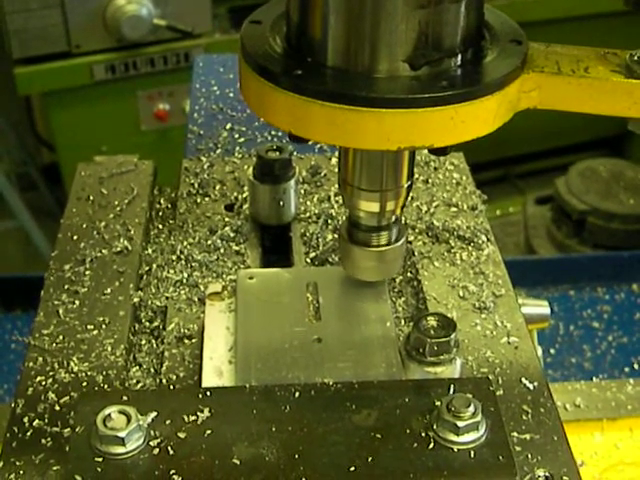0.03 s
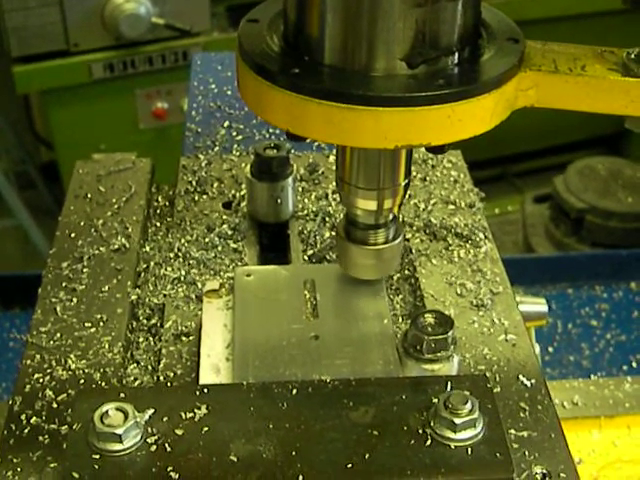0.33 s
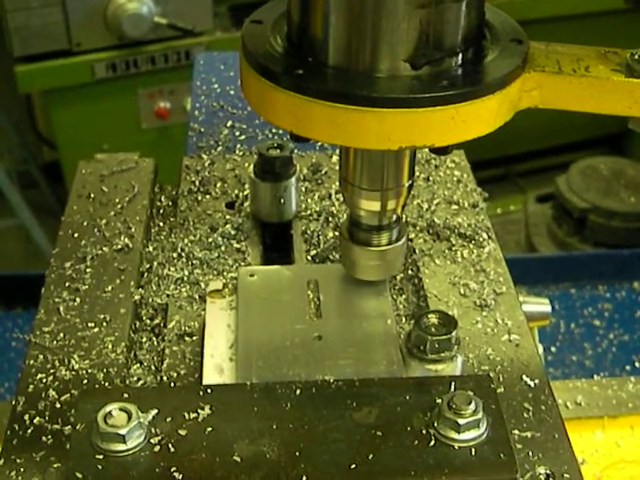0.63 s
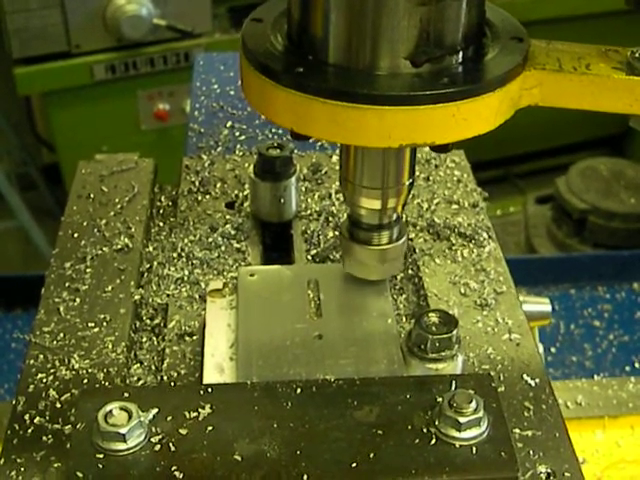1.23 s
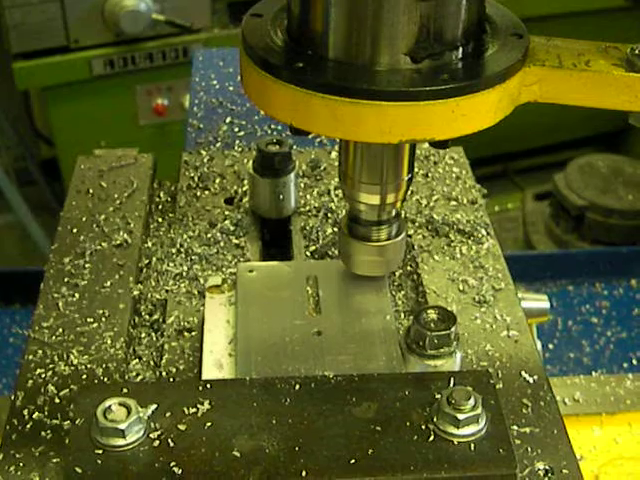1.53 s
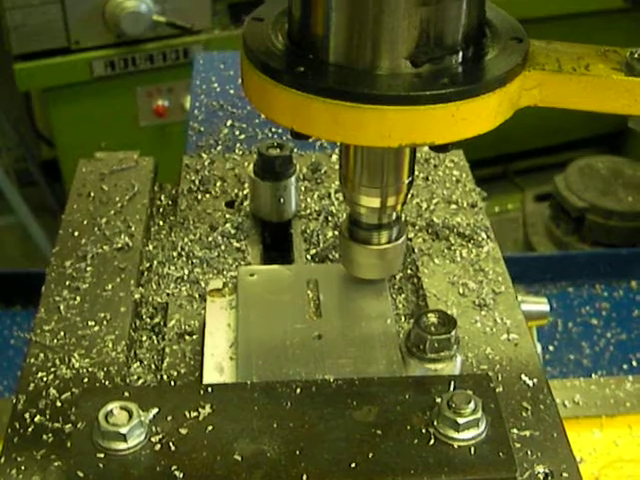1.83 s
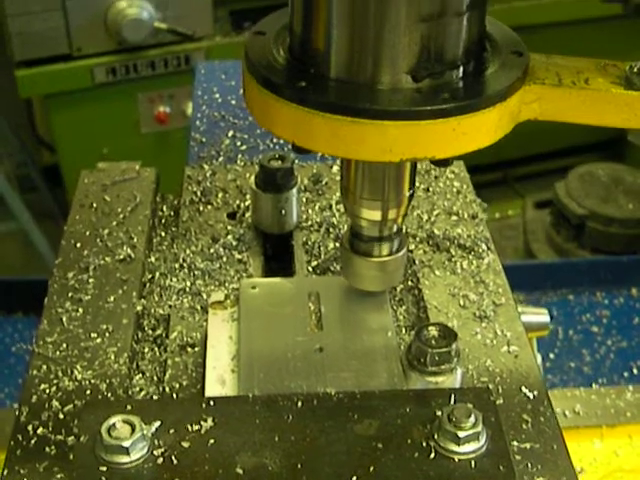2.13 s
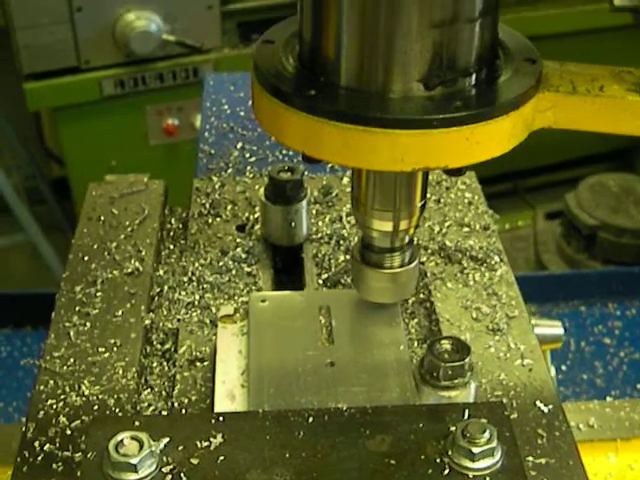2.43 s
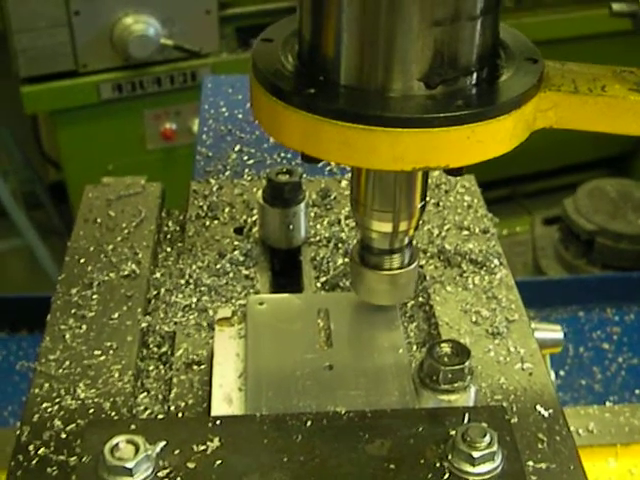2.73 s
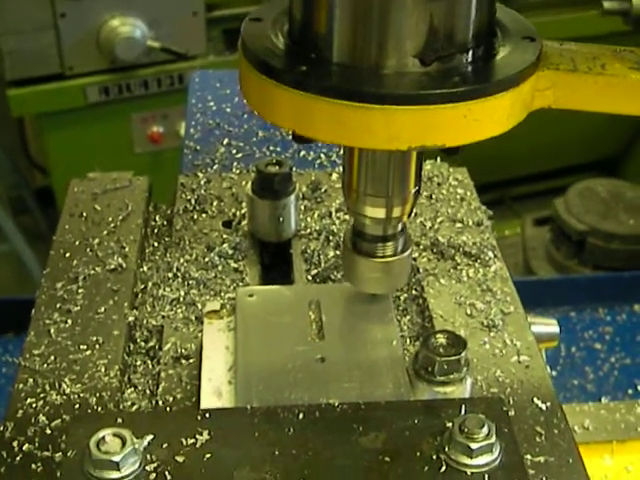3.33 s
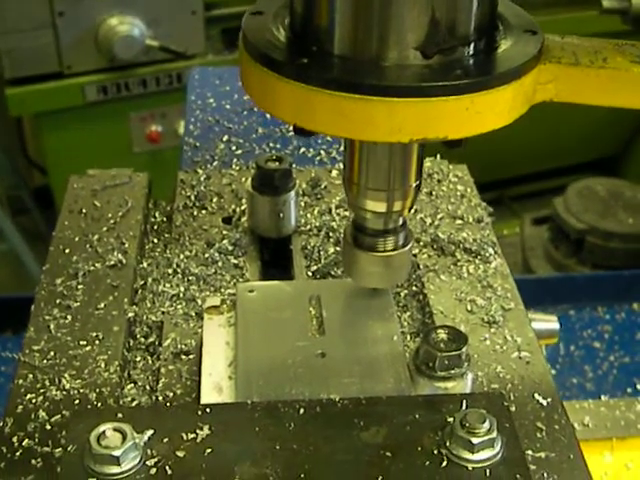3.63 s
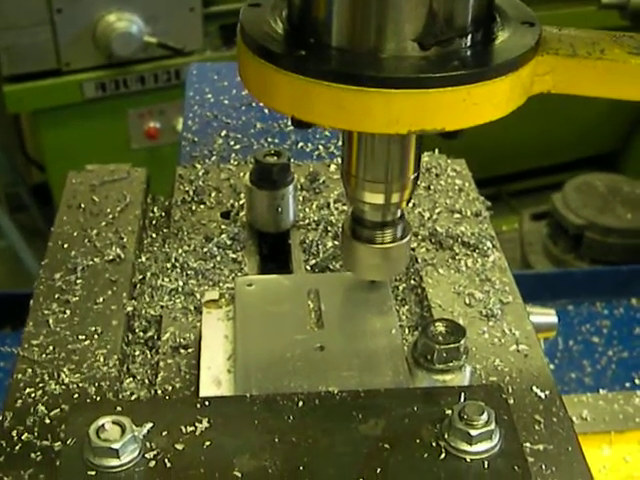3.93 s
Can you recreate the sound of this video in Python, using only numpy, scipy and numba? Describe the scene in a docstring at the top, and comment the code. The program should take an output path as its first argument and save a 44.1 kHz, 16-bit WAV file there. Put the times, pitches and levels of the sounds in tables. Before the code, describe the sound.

A milling machine hums and whines, with a sharp metal clunk, knocks and a low rattle.

```python
"""A small milling machine idles close by: meshing gears whine and the motor hums over a whir of bearings
and fan. An axis drive hums at its step rate and stops after a second with a sharp metal clunk, on which
the narrow-band recorder ducks and overloads. A second drive runs while the slide knocks and a loose
steel part clacks, each ringing in its damped modes. From about two seconds the table travels on with
a low rattle, as ticks of the lead screw excite the bed."""
import sys
import numpy as np
from scipy import signal
from scipy.fft import rfft, irfft
from scipy.io import wavfile
from scipy.ndimage import map_coordinates
from numba import njit

SR = 44100
rng = np.random.default_rng(int(sys.argv[2]) if len(sys.argv) > 2 else 0)


def master(y):
    """Save y as 16-bit WAV."""
    cut = np.clip(np.atleast_2d(y).T, -1, 1)
    pcm = np.round(cut * 32767)  # scale
    wavfile.write(sys.argv[1], SR, pcm.astype(np.int16))


N = 176400
TIME = np.arange(N) / SR
BIN_HZ = np.arange(N // 2 + 1) * SR / N
LN_1000 = np.log(1000)  # exponent of a 60 dB decay


def undb(db):
    """Decibels to amplitude ratio."""
    return 10 ** (np.asarray(db) / 20)


def unit(x):
    """Normalisation to rms 1."""
    return x / np.sqrt(np.mean(x ** 2))


def envelope(rows):
    """Gain interpolated through (seconds, dB) points."""
    return undb(np.interp(TIME, *np.array(rows).T))


def drift(rate_hz):
    """Smooth random modulation of rms 1."""
    return unit(map_coordinates(rng.standard_normal(1024), [TIME * rate_hz], mode="mirror"))


def tone(hz, waver_db, drift_hz):
    """A sinusoid under slow random amplitude and frequency modulation."""
    cycles = np.cumsum(hz + drift_hz * drift(8)) / SR + rng.random()
    return np.sqrt(2) * np.sin(2 * np.pi * cycles) * undb(waver_db * drift(12))


def coloured_noise(points):
    """White noise filtered to a spectrum of (Hz, dB) points."""
    hz, db = np.array(points).T
    gain = undb(np.interp(np.log(np.maximum(BIN_HZ, 1)), np.log(hz), db))
    return unit(irfft(rfft(rng.standard_normal(N)) * gain, N))


def strike(blows, modes, contact_s=0.00077):
    """Modal superposition: each blow (seconds, dB) excites damped sinusoids of alternating sign."""
    t = TIME[:SR // 2]
    ring = sum((-1) ** k * undb(db) * np.sin(2 * np.pi * hz * t) * np.exp(-LN_1000 * t / t60)
               for k, (hz, db, t60) in enumerate(modes))
    onset = (1 - np.exp(-t / contact_s)) / 2
    impulses = np.zeros(N)
    for start, db in blows:
        impulses[int(start * SR)] += undb(db)
    return signal.fftconvolve(impulses, ring * onset)[:N]


def reverberation(blows, modes, level_db, t60, width_hz):
    """Diffuse field of frame and workshop: noise peaking at the modes decays after each blow."""
    power = sum(undb(2 * db) / (1 + ((BIN_HZ - hz) / (width_hz * np.sqrt(hz / 1000))) ** 2) ** 2
                for hz, db, _ in modes)  # width_hz holds at 1 kHz
    noise = unit(irfft(rfft(rng.standard_normal(N)) * np.sqrt(power), N))
    ages = [(np.maximum(TIME - start, 0), db) for start, db in blows]
    energy = sum(undb(2 * db) * (1 - np.exp(-age / 0.0032)) * np.exp(-2 * LN_1000 * age / t60)
                 for age, db in ages)
    return undb(level_db) * noise * np.sqrt(energy)


# Whir spectrum. Each row: frequency in Hz, relative density in dB.
WHIR_SPECTRUM = [(25, -17.5), (70, -24), (110, -8), (170, -3), (260, 1), (400, 2), (470, 0.5), (570, -0.5),
                 (680, 0), (900, 0), (1180, -0.5), (1280, -4), (1420, 1), (1600, -2.5), (1760, -0.5),
                 (1850, 2.5), (1970, -2), (2150, -5), (2300, 1), (2480, -10.5), (2900, -12), (3400, -16.5),
                 (3900, -30), (4400, -27.5)]
# Whir envelope. Each row: time in seconds, level in dB.
WHIR_ENVELOPE = [(0, -28), (.75, -26.5), (1.0, -29.5), (1.3, -31.5), (1.8, -32), (2.05, -31), (3, -29.5),
                 (4, -28)]

def bearings_and_fan(gear_phase, shaft_hz=61.2):
    """Broadband noise, amplitude-modulated by the rotation of gear and shaft."""
    pulsing = 1 + 0.11 * np.sin(gear_phase) + 0.19 * np.sin(2 * np.pi * shaft_hz * TIME)
    flicker = undb(0.5 * drift(25))
    return coloured_noise(WHIR_SPECTRUM) * unit(pulsing) * flicker * envelope(WHIR_ENVELOPE)


# Tones of motor and housing. Each row: frequency in Hz, level in dB.
HUM_TONES = [(120, -53), (388, -47), (501, -48.5), (550, -43), (1039, -47), (1403, -50.5), (1808, -46.5)]
# Frame drone. Each row: time in seconds, level in dB.
DRONE_ENVELOPE = [(0, -47), (.6, -46), (1.0, -40.5), (1.2, -50.5), (1.8, -51), (1.91, -37), (2.1, -51),
                  (3.4, -58.5), (3.9, -45)]

def motor_and_frame():
    """Forced vibration: motor and housing hum, and a low drone of the frame comes and goes."""
    hum = sum(undb(db) * tone(hz, waver_db=2.5, drift_hz=1.17) for hz, db in HUM_TONES)
    return hum + tone(166.5, waver_db=3, drift_hz=1.5) * envelope(DRONE_ENVELOPE)


# Gear harmonics. Each row: multiple of the gear frequency, level in dB.
GEAR_HARMONICS = [(1, -56.5), (9, -43), (13, -40), (14, -30), (15, -41.5), (16, -43.5), (19, -57),
                  (20, -48.5)]
# Mesh noise. Each row: frequency in Hz, relative density in dB.
MESH_SPECTRUM = [(900, -24.5), (1700, -7), (1850, 1), (1980, -9.5), (2300, -6), (2500, -14), (3300, -19),
                 (4300, -29.5)]
# Envelopes of the whine and of its independent tenth harmonic. Each row: time in seconds, gain in dB.
WHINE_ENVELOPE = [(0, -2), (.3, 1.5), (.8, -1.5), (.92, -12), (1.03, -17), (1.33, -10.5), (1.47, -1),
                  (2.1, 1), (2.7, 1.5), (3.2, 0.5), (3.6, -0.5), (4, -2.5)]
TENTH_ENVELOPE = [(0, -38.5), (.8, -35.5), (1.1, -40), (1.6, -37.5), (2.7, -35), (3.1, -37.5),
                  (3.35, -53.5), (3.8, -37)]

def gears(gear_phase, flutter_db=1.2, mesh_db=-38):
    """Periodic tooth contact radiates a harmonic series over the noise of the mesh."""
    def harmonic(order):
        flutter = undb(flutter_db * drift(14))
        return np.sqrt(2) * flutter * np.sin(order * gear_phase + 2 * np.pi * rng.random())

    whine = sum(undb(db) * harmonic(order) for order, db in GEAR_HARMONICS)
    mesh = undb(mesh_db) * coloured_noise(MESH_SPECTRUM)
    return (whine + mesh) * envelope(WHINE_ENVELOPE) + harmonic(10) * envelope(TENTH_ENVELOPE)


# Modes of the bed. Each row: frequency in Hz, relative level in dB, T60 in seconds.
BED_MODES = [(232, -9, 0.37), (257, -7.5, 0.15), (313.4, 0.5, 0.37), (363, 0, 0.11), (404, -0.5, 0.19),
             (420.7, -7, 0.14)]
# Table rattle. Each row: time in seconds, level in dB.
RATTLE_ENVELOPE = [(1.3, -40), (1.9, -37.5), (2.03, -33), (2.33, -31.5), (2.4, -38.5), (2.47, -32.5),
                   (2.58, -30.5), (2.63, -37), (2.77, -32.5), (2.97, -35), (3.5, -36.5), (3.57, -32),
                   (3.66, -38), (4, -38)]

def table_rattle(tick_hz=41.64, jitter=0.1, scatter_db=2):
    """A quasi-periodic impulse train from the lead screw keeps the bed resonating."""
    ticks = [((k + jitter * late) / tick_hz, scatter_db * size)
             for k, (late, size) in enumerate(rng.standard_normal((200, 2)))]
    ticks = [(max(start, 0), db) for start, db in ticks if start < N / SR]
    return unit(strike(ticks, BED_MODES)) * envelope(RATTLE_ENVELOPE)


# Envelopes of the two axis drives. Each row: time in seconds, level in dB.
FIRST_DRIVE = [(0, -26), (.17, -30), (.3, -25), (.38, -27), (.76, -24.5), (.86, -24.5), (.92, -27.5),
               (1.03, -31.5)]
SECOND_DRIVE = [(.9, -51), (.99, -29.5), (1.06, -44), (1.12, -32.5), (1.4, -30.5), (1.6, -34.5),
                (1.85, -38.5), (2.0, -57)]

def axis_drives(stop_s=1.038, ramp_s=0.012):
    """Periodic forcing: each motor hums at its step rate; the first and its side tone end at the stop."""
    running = np.clip((stop_s - TIME) / ramp_s + .5, 0, 1)
    first = tone(310.8, waver_db=1.5, drift_hz=0.37) * envelope(FIRST_DRIVE)
    side_tone = undb(-40) * tone(364.5, waver_db=5, drift_hz=0.8)
    second = tone(501.5, waver_db=1, drift_hz=0.51) * envelope(SECOND_DRIVE)
    return (first + side_tone) * running + second


# Knocks on the slide. Each row: start in seconds, level in dB.
SLIDE_BLOWS = [(.933, -20.5), (.975, -19), (.984, -25.5), (1.138, -26), (1.374, -16), (1.387, -21),
               (1.399, -13), (1.416, -16), (1.421, -12), (1.428, -21), (1.451, -23), (1.462, -23.5),
               (1.513, -20)]
# Modes of the slide. Each row: frequency in Hz, level in dB, T60 in seconds.
SLIDE_MODES = [(183, -12, 0.054), (267.6, -4.5, 0.053), (340, -3.5, 0.056), (531, -4.5, 0.062),
               (680, -2.5, 0.05), (840, 0, 0.036), (1030, -5.5, .035), (1477, -6, 0.06),
               (1670, -5.5, 0.091), (2280, -15, 0.033), (2520, -14.5, 0.034), (2950, -15.5, .03)]

def slide_knocks():
    """Impacts on heavily damped modes give dull knocks."""
    tail = reverberation(SLIDE_BLOWS, SLIDE_MODES, level_db=-9, t60=0.38, width_hz=84)
    return strike(SLIDE_BLOWS, SLIDE_MODES) + tail


# Clacks. Each row: start in seconds, level in dB, extra gain of the upper modes in dB.
STEEL_BLOWS = [(1.337, -20, -7), (1.37, -12.5, -25), (1.885, -19.5, 7), (1.9, -16.5, -20.5),
               (1.905, -18.5, 4), (1.9218, -16, 7), (1.929, -14, -17), (1.943, -22, 0), (1.978, -20.5, 9)]
# Modes of the loose part. Each row: frequency in Hz, level in dB, T60 in seconds.
STEEL_MODES = [(1154, 3, 0.059), (1403, 2.5, 0.085), (2124, 3.5, .05), (2306, -3, 0.052), (3115, -13, .04)]

def loose_steel(split_hz=1800):
    """Free vibration of a loose steel part: each blow weights the lower and upper modes differently."""
    lower_blows = [(start, db) for start, db, _ in STEEL_BLOWS]
    upper_blows = [(start, db + extra) for start, db, extra in STEEL_BLOWS]
    lower = strike(lower_blows, [mode for mode in STEEL_MODES if mode[0] < split_hz])
    upper = strike(upper_blows, [mode for mode in STEEL_MODES if mode[0] >= split_hz])
    return lower + upper + reverberation(lower_blows, STEEL_MODES, level_db=-10, t60=0.22, width_hz=300)


# Hard blows. Each row: start in seconds, boom level in dB, tick level in dB.
HARD_BLOWS = [(1.418, -31.5, -24), (1.452, -27, -38), (1.922, -35, -23.5)]
# Modes of the frame. Each row: frequency in Hz, level in dB, T60 in seconds.
FRAME_MODES = [(174, -2.5, .3), (254, 2.5, 0.49), (332, 6, .25)]
# Contact tick. Each row: frequency in Hz, relative density in dB.
TICK_SPECTRUM = [(600, -17), (2000, 3), (3200, 1), (4200, -14.5)]

def hard_blows(tick_t60=0.03):
    """Brief contact radiates a broadband tick and sets the low modes of the frame booming."""
    bursts = sum(undb(db) * (TIME > start) * np.exp(-LN_1000 * np.abs(TIME - start) / tick_t60)
                 for start, _, db in HARD_BLOWS)
    boom = strike([(start, db) for start, db, _ in HARD_BLOWS], FRAME_MODES)
    return coloured_noise(TICK_SPECTRUM) * bursts + boom


# Contacts at the stop. Each row: start in seconds, level in dB.
STOP_BLOWS = [(1.0345, -2.5), (1.0367, 2.5), (1.0389, -10)]
# Short and long modes of the stop. Each row: frequency in Hz, level in dB, T60 in seconds.
CLUNK_MODES = [(150, -18, .04), (507, -18.5, .03), (700, -9, 0.021), (1140, -3, 0.052), (1482, -8, 0.049),
               (1790, 1, 0.0099), (2306, 4.5, 0.015), (2352, -6.5, .025), (2883, -3.5, .02),
               (3214, -11.5, .025), (3420, -13.5, .02)]
AFTER_RING_MODES = [(1141, -31, 1), (1440, -33, .7), (1803, -35, 0.92), (2000, -43, .45), (2401, -28.5, .6),
                    (2610, -41, .45), (2930, -34, 0.49)]

def stop_clunk():
    """Transient response: three contacts fuse into one clunk, and lightly damped modes ring on."""
    clunk = strike(STOP_BLOWS, CLUNK_MODES)
    after_ring = strike(STOP_BLOWS[:1], AFTER_RING_MODES)
    crash = reverberation(STOP_BLOWS, CLUNK_MODES, level_db=-15, t60=0.12, width_hz=220)
    tail = reverberation(STOP_BLOWS, CLUNK_MODES, level_db=-27.5, t60=0.97, width_hz=89)
    return clunk + after_ring + crash + tail


def scene():
    """Linear superposition of all sources, in mono; whir and whine share one gear phase."""
    gear_hz, wow = 133.44, 0.00039
    gear_phase = 2 * np.pi * np.cumsum(gear_hz * (1 + wow * drift(5))) / SR
    idle = bearings_and_fan(gear_phase) + motor_and_frame() + gears(gear_phase)
    travel = table_rattle() + axis_drives()
    impacts = slide_knocks() + loose_steel() + hard_blows() + stop_clunk()
    return (idle + travel + impacts)[None]


def lowpass(x, hz, order):
    """Zero-phase low-pass with a Butterworth magnitude response."""
    f = np.arange(N + 1) * SR / (2 * N)
    mirrored = np.concatenate([x, x[::-1]])
    return irfft(rfft(mirrored) / np.sqrt(1 + (f / hz) ** (2 * order)))[:N]


@njit
def follow_level(x, attack_s, release_s):
    """Envelope detection: one-pole smoothing with separate times for rise and fall."""
    out, level = np.empty(len(x)), 0.
    for i in range(len(x)):
        level += (x[i] - level) / (SR * (attack_s if x[i] > level else release_s))
        out[i] = level
    return out


def record(dry):
    """Band limiting, compression, asymmetric clipping in an off-centre converter, and a last low-pass."""
    threshold_db, duck_slope = -12.5, 0.4  # slope: dB of ducking per dB over the threshold
    offset, ceiling = -0.146, 0.719  # shares of full scale
    narrow = lowpass(dry[0], hz=4030, order=36)
    level = follow_level(np.abs(narrow), attack_s=0.0041, release_s=0.27)
    gain = np.minimum(undb(threshold_db) / (level + 1e-9), 1) ** duck_slope
    clipped = np.clip(narrow * gain, -ceiling - offset, ceiling - offset)
    return lowpass(clipped, hz=15800, order=30)[None] + offset


dry = scene()
out = record(dry)
master(out)
```